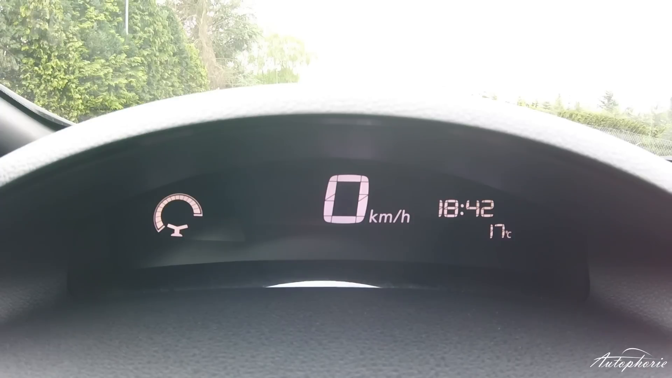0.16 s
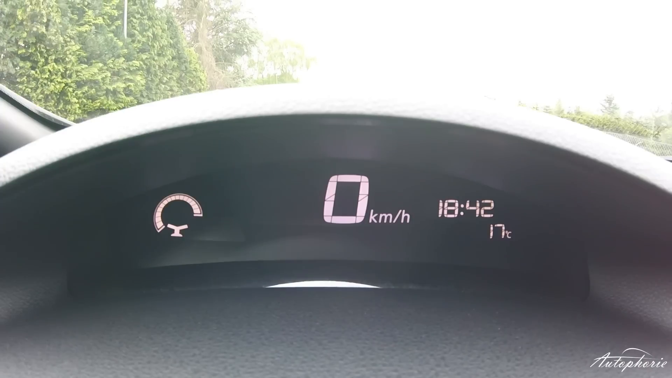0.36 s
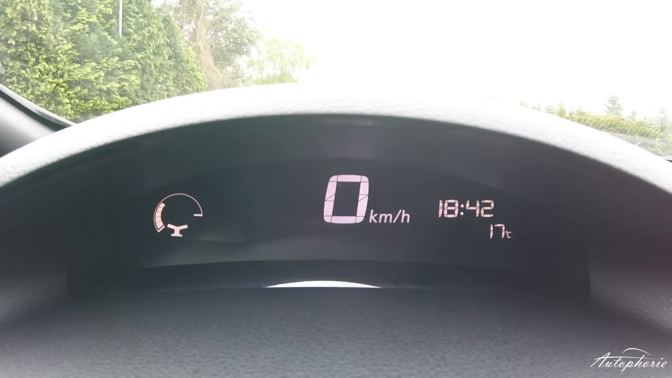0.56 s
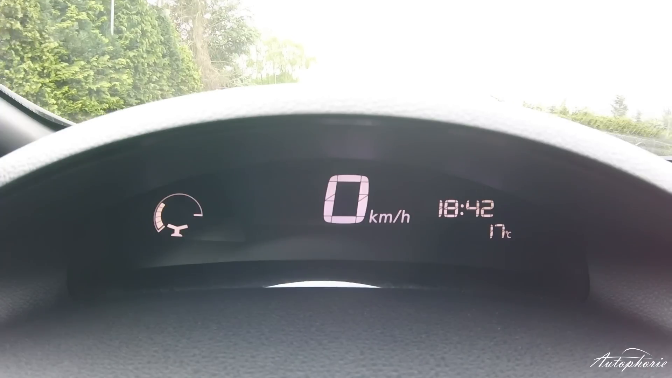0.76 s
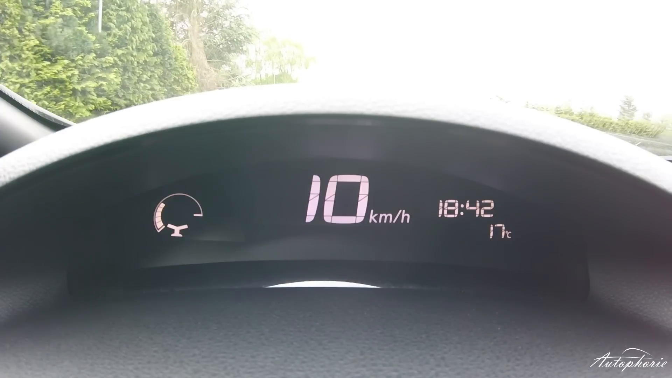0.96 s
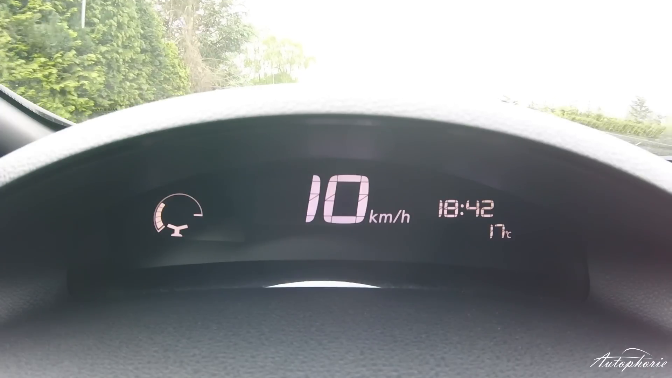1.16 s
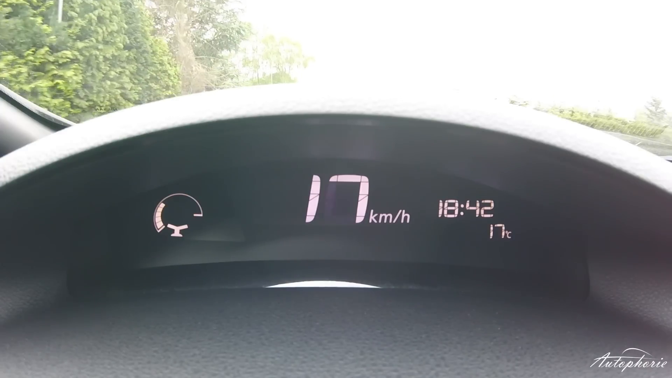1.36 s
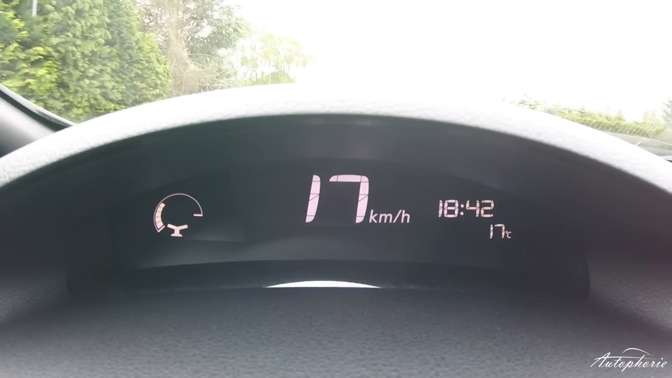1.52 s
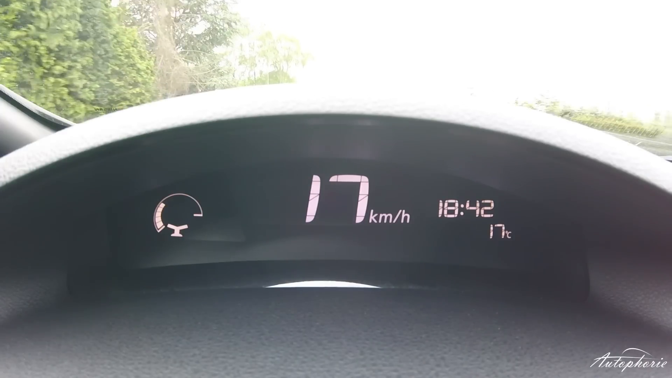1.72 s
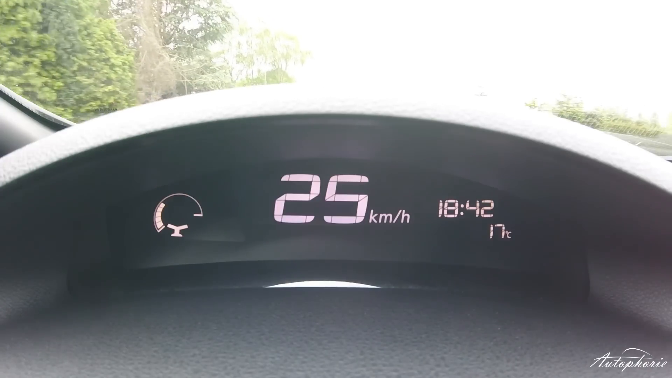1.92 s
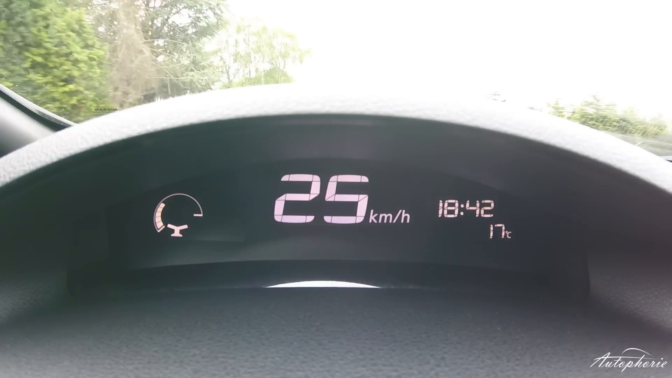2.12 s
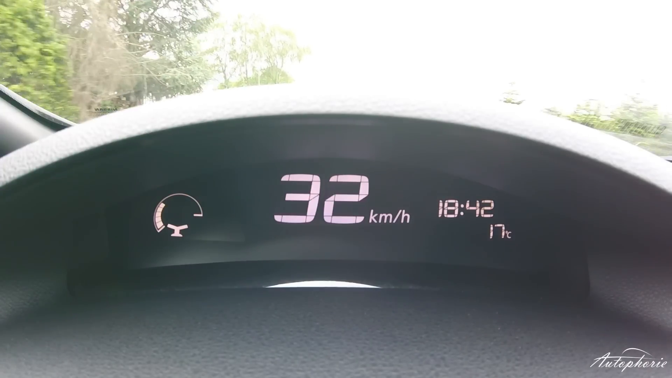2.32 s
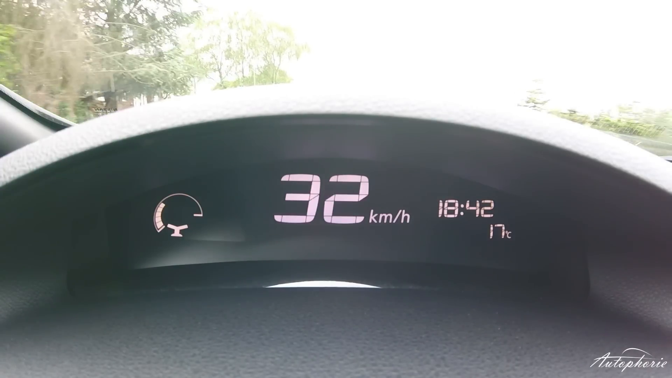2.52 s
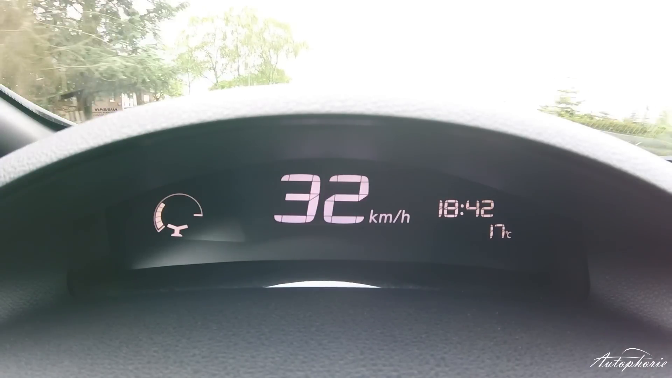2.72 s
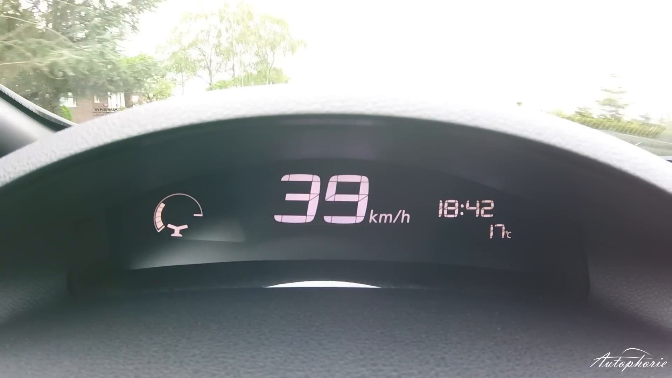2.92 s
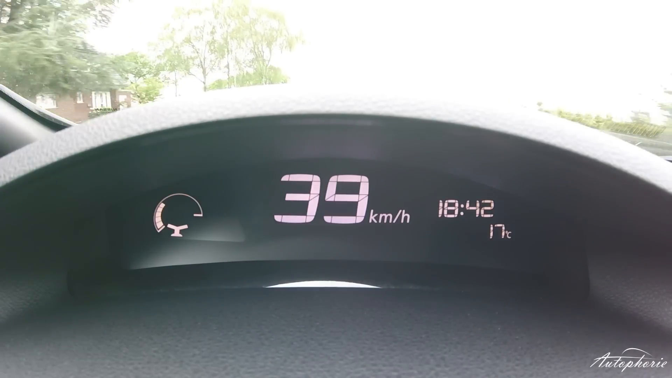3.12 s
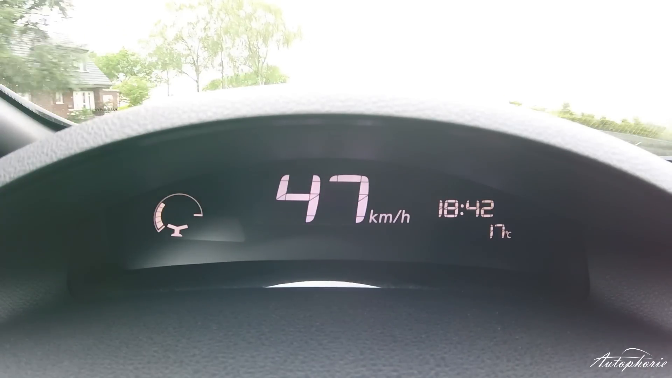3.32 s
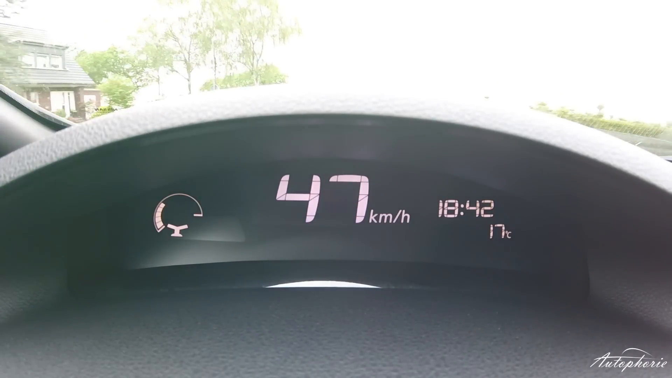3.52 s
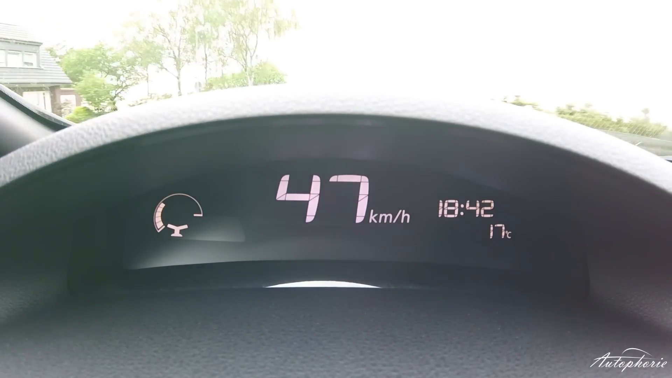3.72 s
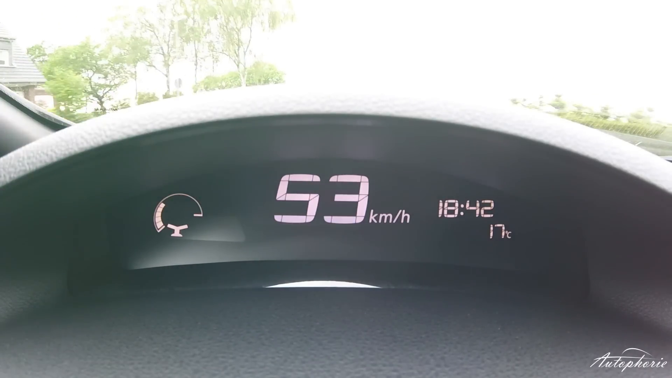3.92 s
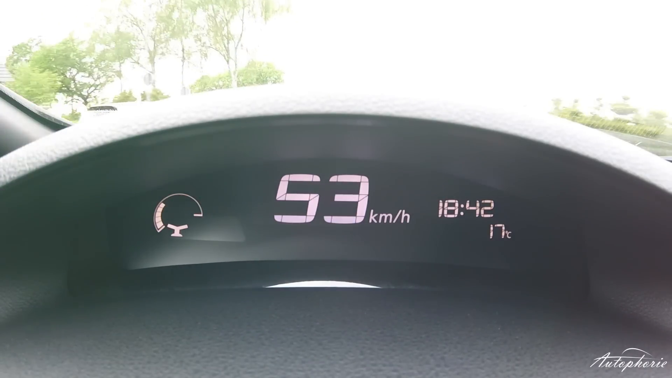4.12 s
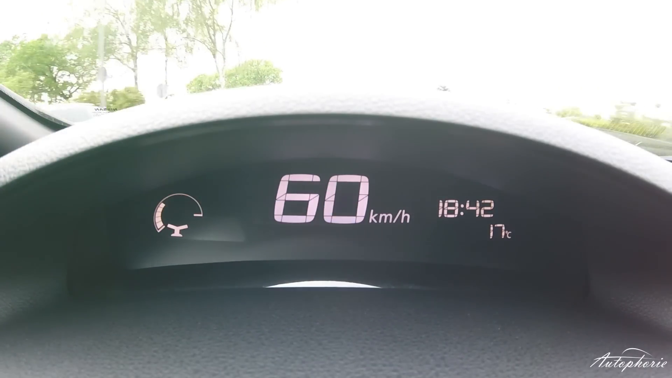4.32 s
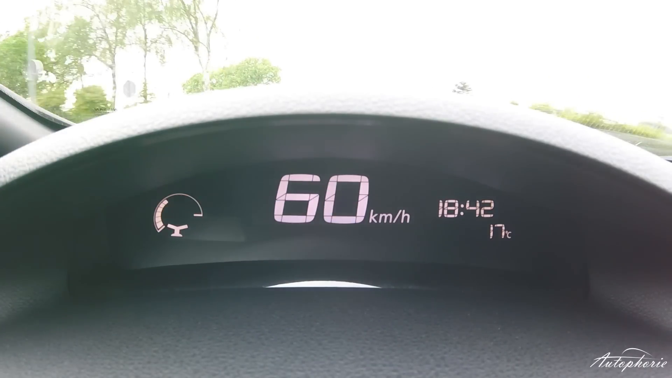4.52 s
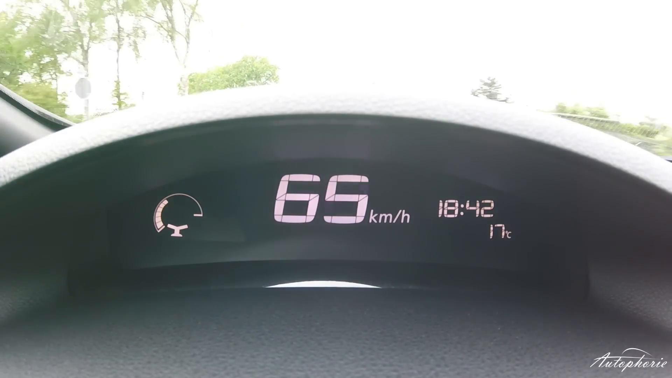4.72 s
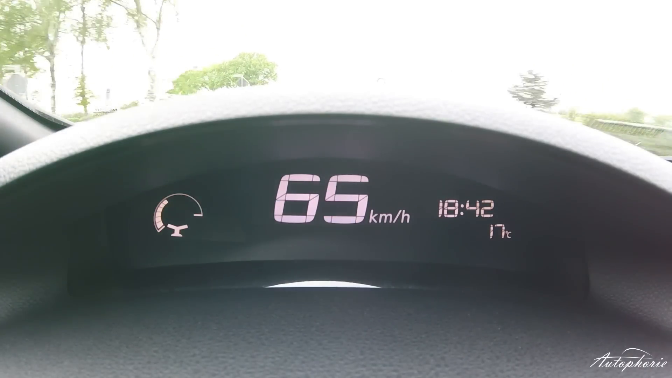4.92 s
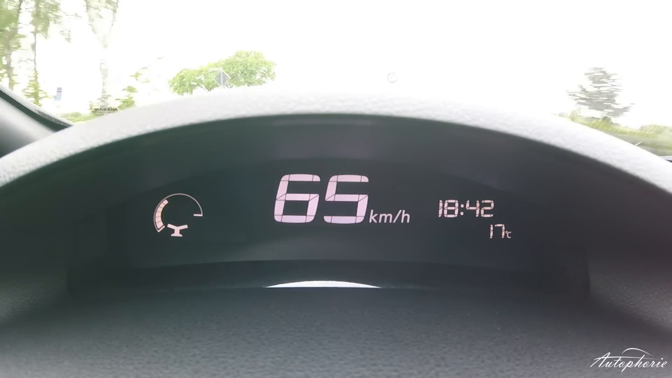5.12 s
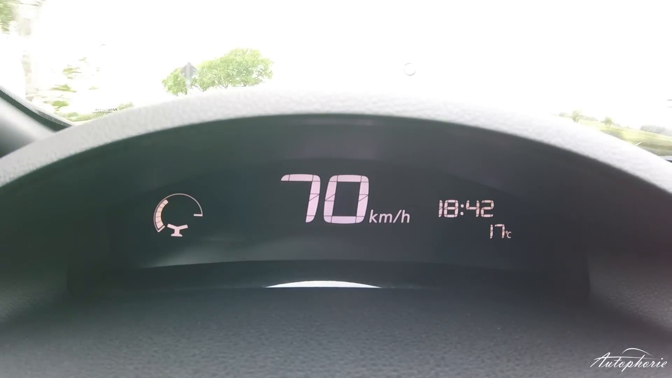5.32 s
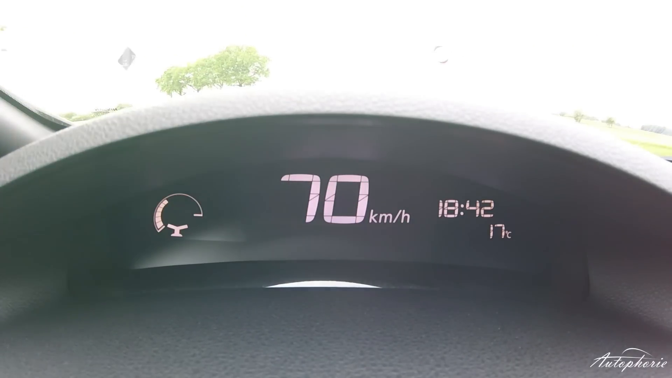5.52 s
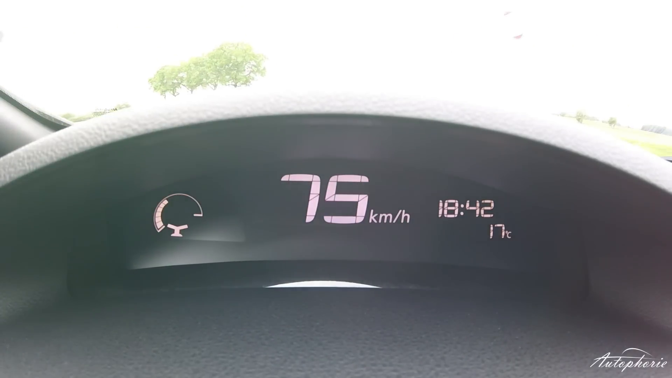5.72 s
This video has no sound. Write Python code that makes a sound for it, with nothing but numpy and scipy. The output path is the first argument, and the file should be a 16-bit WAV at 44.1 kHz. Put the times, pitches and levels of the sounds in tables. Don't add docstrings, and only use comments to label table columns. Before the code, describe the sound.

The dashboard microphone sits in the closed cabin of an electric car for nearly six seconds. It begins almost quiet, with faint air vent hiss, slightly muffled until a sharp little click at 0.03 s. A dull low thump follows at about 0.1 s as the pedal lands, with dry trim creaks and ticks around 0.2 s and a few more up to 1.3 s. From about 0.25 s a clean motor tone with lower gear tones sweeps upward, swelling unevenly, clearest in the first two seconds, then thin, high and increasingly masked. Tyre hum enters after 0.8 s. Deep, lumpy road rumble and cabin booming grow from about 1 s, with heavy surges near 2.5, 3.3, 4.4 and 4.8 s. A very faint wavering seam whistle starts after 3.1 s. Tyre roar and wind keep building; a softer click falls at 4.7 s, and the ride ends abruptly at speed.

```python
import sys
import numpy as np
from scipy import signal
from scipy.fft import rfft, irfft
from scipy.io import wavfile
from scipy.ndimage import uniform_filter1d

SR = 44100
rng = np.random.default_rng(int(sys.argv[2]) if len(sys.argv) > 2 else 0)


def pcm_store(signal):
    levels = np.round(np.clip(np.atleast_2d(signal), -1, 1) * 32767)
    wavfile.write(sys.argv[1], SR, levels.astype(np.int16).T)


def ratio_of_db(decibels):
    return 10 ** (np.asarray(decibels, float) / 20)


N = 254016
T = np.arange(N) / SR


def slot_hz():
    # t/s, f/Hz
    speed_points = [(.2, 110), (.46, 437), (.79, 901), (.96, 1164), (2.0, 2810), (2.69, 3852), (3.24, 4715),
                    (3.81, 5509), (4.1, 5880), (4.7, 6550), (5.76, 7600)]
    s, hz = np.transpose(speed_points)
    return np.interp(T, s, hz)


def evened(x):
    return x / np.sqrt(np.mean(x ** 2) + 1e-20)


def bell(hz, centre_hz, width_hz):
    return 1 / np.sqrt(1 + (2 * (hz - centre_hz) / width_hz) ** 2)


def resonances(hz, rows):
    return np.sqrt(sum((ratio_of_db(db) * bell(hz, f, width) ** 2) ** 2 for f, width, db in rows))


def noise(shape, count=N):
    hz = np.fft.rfftfreq(count, 1 / SR)
    spectrum = rfft(rng.standard_normal(count)) * shape(hz)
    return evened(irfft(spectrum, count))


def drift(rate_hz):
    return noise(lambda hz: bell(hz, 0, rate_hz) ** 2)


def tone(hz, db):
    turns = np.cumsum(hz) / SR + rng.random()
    return np.sqrt(2) * ratio_of_db(db) * np.sin(2 * np.pi * turns)


def colour_db(points, hz):
    f, db = np.transpose(points)
    return np.interp(np.log(hz + 1), np.log(f + 1), db)


def rolling(lo_hz, hi_hz, steady, gust_db):
    # f/Hz, level/dB per Hz
    roll_colour = [(12, -45.5), (24, -16), (33, 0.5), (45, -7.5), (90, -15), (102, -20.5), (120, -15),
                   (190, -27), (330, -35), (420, -38), (1050, -46), (1450, -62.5), (2500, -72.5),
                   (4000, -78.5), (7000, -81)]
    # f/Hz, width/Hz, lift/dB
    cabin_modes = [(62.6, 7.2, 14.5), (80.4, 27.4, 10), (145.2, 98, 8), (242.6, 39, 9.5), (570, 290, 3.5),
                   (800, 7, 8), (955, 26, 5), (1667, 18, 7.5), (2240, 12, 7.5)]

    def shape(hz):
        db = colour_db(roll_colour, hz)
        db = db + sum(lift * bell(hz, f, width) ** 2 for f, width, lift in cabin_modes)
        band_edges = np.sqrt((1 + (lo_hz / (hz + 1)) ** 12) * (1 + (hz / hi_hz) ** 12))
        return ratio_of_db(db) / band_edges

    x = noise(shape)
    swell = uniform_filter1d(uniform_filter1d(x ** 2, size=2500), size=2500) + 0.085
    gusts = ratio_of_db(gust_db * drift(22))
    return evened(x / swell ** (np.clip(steady, 0, 1) / 2) * gusts)


def waking(bumps, rest_db, full_db, half_hz, steep):
    awake = 1 / (1 + (half_hz / slot_hz()) ** steep)
    power = ratio_of_db(2 * rest_db) + ratio_of_db(2 * full_db) * awake
    for s, db, half_s in bumps:
        power = power + ratio_of_db(2 * db) * np.exp(-((T - s) / half_s) ** 2)
    return np.sqrt(power)


def road():
    # t/s, level/dB, half length/s
    humps = [(0.234, -27.5, 0.056), (.49, -35, 0.14), (0.8, -28, 0.022), (1.05, -30.5, 0.085),
             (1.622, -26, 0.082), (1.858, -26.5, 0.047), (2.284, -22.5, 0.061), (2.75, -24, 0.13),
             (3.347, -19, 0.076), (3.64, -25, 0.065), (4.03, -21.5, .07), (4.218, -24, 0.034),
             (4.716, -19, 0.094), (5.028, -26, 0.032), (5.533, -24, 0.066)]
    # t/s, level/dB, half length/s
    joints = [(0.152, -38, 0.022), (0.223, -34.5, .1), (.72, -24, 0.09), (0.88, -24, 0.018),
              (1.18, -21.5, 0.028), (1.278, -26.5, 0.037), (1.643, -28.5, 0.12), (1.895, -27.5, 0.092),
              (2.03, -30, 0.046), (2.177, -20.5, 0.015), (2.516, -18, 0.074), (2.714, -18.5, 0.051),
              (2.861, -20, .09), (3.114, -16.5, 0.036), (3.269, -21.5, 0.012), (3.404, -20, 0.032),
              (3.582, -17, 0.081), (3.881, -28, .07), (4.016, -24.5, 0.22), (4.358, -13, 0.061),
              (4.508, -23, 0.11), (4.831, -16.5, 0.059), (5.057, -22, .07), (5.242, -21.5, 0.14),
              (5.348, -17.5, 0.039), (5.554, -20.5, 0.096)]
    # t/s, level/dB, half length/s
    jolts = [
        (0.092, -28.5, 0.017),
        (.23, -49, 0.05),
        (0.852, -39.5, 0.08),
        (1.028, -36.5, 0.056),
        (1.186, -29, 0.04),
        (2.42, -35, 0.054),
        (3.3, -35, 0.28),
        (5.662, -33, 0.12),
    ]
    # t/s, level/dB, half length/s
    shudders = [
        (0.092, -51, 0.023),
        (0.265, -48.5, 0.1),
        (.85, -63, 0.09),
        (1.563, -38, 0.092),
        (1.87, -38.5, 0.065),
    ]
    heave = waking(humps, rest_db=-52, full_db=-25.5, half_hz=3502, steep=2.1)
    boom = waking(joints, rest_db=-46.5, full_db=-28, half_hz=2602, steep=1)
    rail = waking(jolts, rest_db=-51.5, full_db=-35, half_hz=1498.5, steep=6.5)
    drum = waking(shudders, rest_db=-68, full_db=-40, half_hz=1902, steep=4.5)
    out = heave * rolling(8, 47, steady=.8, gust_db=.1)
    out += boom * rolling(47, 91, steady=.8, gust_db=.1)
    out += rail * rolling(105, 190, steady=.7, gust_db=.3)
    return out + drum * rolling(191, 330, steady=.5, gust_db=1.)


def vent():
    # f/Hz, level/dB
    hiss_colour = [(300, -16.5), (700, -10), (1500, 1), (2500, -2.5), (3800, -8.5), (6900, -6),
                   (9000, -10.5), (12800, -19.5), (15500, -19.5)]
    hiss = ratio_of_db(-66.5) * noise(lambda hz: ratio_of_db(colour_db(hiss_colour, hz)))
    pipe = tone(2240 + 22 * drift(40), -86 + 4.0 * drift(6))
    inverter = tone(10002 + 0 * T, -101)
    return hiss + pipe + inverter


def roar():
    tyres = waking([(0, -52, 0.13)], rest_db=-57, full_db=-38.5, half_hz=5000.5, steep=4)
    wind = waking([(.55, -71.5, 0.28)], rest_db=-79.5, full_db=-53, half_hz=6496.5, steep=4.5)
    out = tyres * ratio_of_db(-2.0) * rolling(257.0, 1200, steady=0.13, gust_db=1.14)
    return out + wind * ratio_of_db(-3.5) * rolling(1374, 6000, steady=.1, gust_db=0.6)


def thump():
    start_s, ring_hz, peak_db = .0703, 68, -18
    peak_after_s, half_s = .021, .024
    t = np.maximum(T - start_s, 0)
    swell = np.exp(-((t - peak_after_s) / half_s) ** 2)
    return ratio_of_db(peak_db) * swell * np.sin(2 * np.pi * ring_hz * t)


def creaks():
    # t/s, level/dB rms, f/Hz, width/Hz, length/s
    creak_rows = [(0.082, -54, 696, 900, 0.025), (.088, -72, 3500, 3500, .015),
                  (0.1942, -44, 530, 380, 0.025), (0.195, -58.5, 3400, 3600, 0.012),
                  (.209, -50.5, 930, 1000, 0.023), (0.21, -59.5, 3800, 3000, 0.02),
                  (0.255, -52.5, 620, 500, 0.011), (0.318, -70.5, 1980, 120, 0.081),
                  (0.536, -68, 3500, 4000, 0.0089), (0.69, -68, 4500, 3000, 0.091),
                  (0.712, -67.5, 2920, 1200, 0.057), (0.729, -52, 446, 400, 0.027),
                  (0.722, -70, 1810, 900, 0.03), (0.787, -71, 4500, 2980, .02), (.07, -42, 154, 119, 0.061),
                  (1.152, -68, 4200, 1000, .005), (1.209, -63.5, 4670, 1800, 0.007),
                  (1.271, -59, 4740, 2200, 0.011)]
    out = np.zeros(N)
    for s, db, hz, width, lasts_s in creak_rows:
        u = np.arange(4096) / SR / lasts_s
        shape = np.minimum(16 * u, 1) * np.exp(-1.5 * u ** 2)
        burst = shape * noise(lambda f: bell(f, hz, width) ** 2, count=4096)
        at = round(s * SR)
        out[at:at + 4096] += ratio_of_db(db + 4) * evened(burst) * np.sqrt(np.mean(shape ** 2))
    return out


def motor():
    # multiple of the slot tone, level/dB, growth/dB per doubled speed
    orders = [(1, -.3, 0), (.25, -1, 2), (.5, -17, 0), (1.5, -13, 0), (.189, -3, 3), (.2835, -7.5, 10),
              (.357, -7, 9), (.378, -8, 9), (.472, -15, 6), (.925, -14, 9)]
    # f/Hz, width/Hz, level/dB
    path_modes = [(235, 75, -40), (285, 45, -43), (460, 35, -56), (495, 30, -54), (548, 40, -52),
                  (622, 40, -57), (700, 70, -62.5), (807, 40, -56.5), (860, 40, -62), (902, 40, -58),
                  (951, 45, -55), (1077, 40, -66), (1165, 50, -56), (1250, 35, -60), (1310, 30, -63.5),
                  (1660, 70, -73), (1821, 80, -69), (2030, 80, -71), (2200, 80, -72), (2400, 200, -79),
                  (3050, 400, -83), (3350, 200, -77), (3630, 160, -74), (4020, 200, -73.5),
                  (4310, 180, -75), (4700, 250, -81), (4950, 150, -79), (5250, 250, -80), (5650, 160, -79),
                  (5870, 120, -81)]
    pedal_s, rise_s, from_db = .2, .24, -19
    base_hz, fade_db_per_khz, fade_most_db = 5800, -8, -9
    hz = slot_hz()
    torque_db = from_db * np.clip(1 - (T - pedal_s) / rise_s, 0, 1)
    torque_db += np.clip(fade_db_per_khz * (hz - base_hz) / 1000, fade_most_db, 0)
    grid_hz = np.arange(0, 12000., 2)
    path = resonances(grid_hz, path_modes) + 1e-5
    out = 0
    for multiple, db, growth_db in orders:
        line_hz = multiple * hz
        flutter_db = growth_db * np.log2(hz / 4500) + 1.8 * drift(70)
        out += np.interp(line_hz, grid_hz, path) * tone(line_hz, db + torque_db + flutter_db)
    return out * np.clip((T - .22) / 0.055, 0, 1)


def tread():
    # f/Hz, width/Hz, level/dB
    panel_modes = [(150, 40, -2), (235, 44, 4), (272, 36, 3), (330, 40, -9), (385, 50, -6), (450, 54, -4),
                   (495, 40, -5), (548, 46, -2), (620, 60, -16)]
    centre, spread = .102, .0145
    hz = slot_hz()
    grid_hz = np.arange(1500.)
    panels = resonances(grid_hz, panel_modes)
    out = 0
    for step in np.linspace(-2.4, 2.4, 50) + .04 * rng.standard_normal(50):
        line_hz = (centre + spread * step) * hz
        out += np.interp(line_hz, grid_hz, panels) * tone(line_hz, -49.5 - 4.3 * step ** 2)
    return out * ratio_of_db(1.3 * drift(16)) * np.clip((T - .8) / .8, 0, 1)


def seam_whistle():
    t = T - 3.1
    hz = 4360 - 45 * t + 20 * drift(1.5) + 42 * drift(60)
    db = -78.5 - 2.8 * t + 3.5 * drift(14)
    return tone(hz, db) * np.clip(t / .55, 0, 1)


def scene():
    cabin = road() + vent() + roar() + thump() + creaks()
    return (cabin + motor() + tread() + seam_whistle())[None]


def patchy_treble(x):
    hz, t, z = signal.stft(x, SR, nperseg=1024, noverlap=512)
    hz = hz[:, None]
    pairs = np.arange(len(t)) // 2
    need = np.interp(t, T, drift(9))[pairs * 2]
    draws = rng.random((len(hz) // 6 + 1, len(t)))
    cells = draws[np.arange(len(hz)) // 6][:, pairs]
    chance = np.clip((hz - 7800) / 3500, 0, 1) * np.clip(0.24 + 0.21 * need, 0, 1)
    kept = (cells > chance) & (hz < 14100 - 250 * need)
    return signal.istft(z * np.where(kept, 1, .06), SR, nperseg=1024, noverlap=512)[1][:, :N]


def top_cut(x):
    return signal.sosfilt(signal.butter(12, 16350, fs=SR, output="sos"), x)


def record(dry):
    # t/s, step, fade/s, edge/s
    jumps = [
        (.029603, -.046, .0041, 2e-6),
        (4.72978, .03, .0021, 3e-5),
    ]
    out = patchy_treble(dry)
    dull = signal.sosfiltfilt(signal.butter(2, 1200, fs=SR, output="sos"), out)
    out = np.where(T < jumps[0][0], dull + 0.5 * (out - dull), out)
    for s, step, fade_s, edge_s in jumps:
        out = out + step / 2 * np.tanh((T - s) / edge_s) * np.exp(-abs(T - s) / fade_s)
    out = out * (1 - .7 * np.exp((T - T[-1]) / .004))
    return top_cut(out)


dry = scene()
out = record(dry)
pcm_store(out)
```